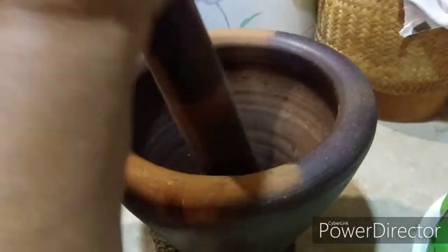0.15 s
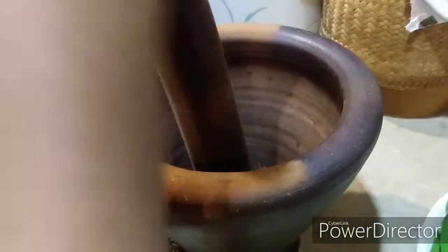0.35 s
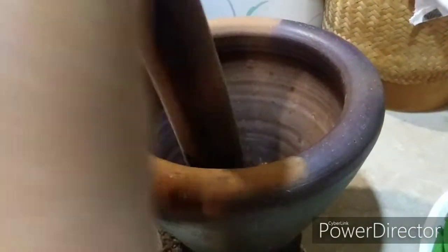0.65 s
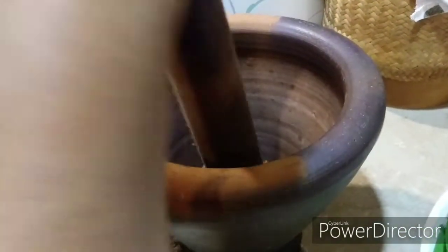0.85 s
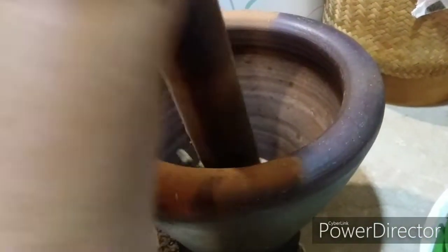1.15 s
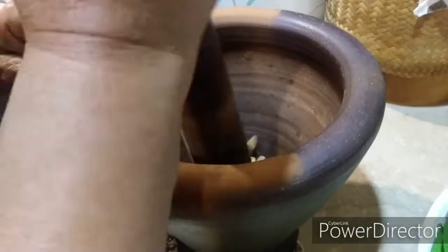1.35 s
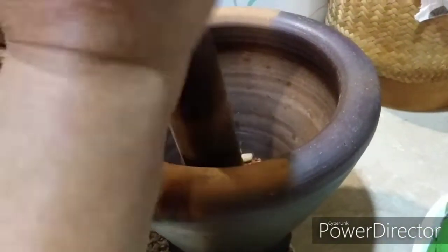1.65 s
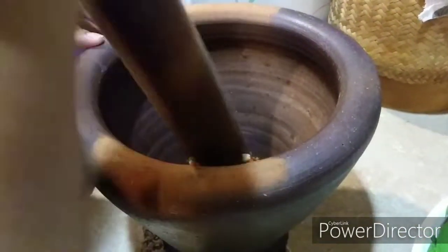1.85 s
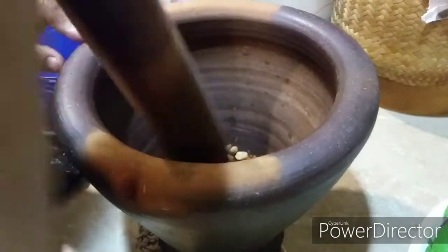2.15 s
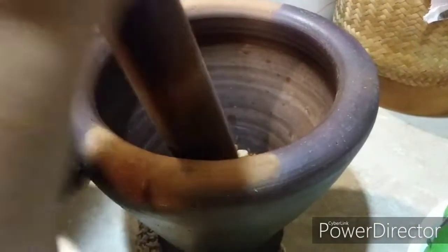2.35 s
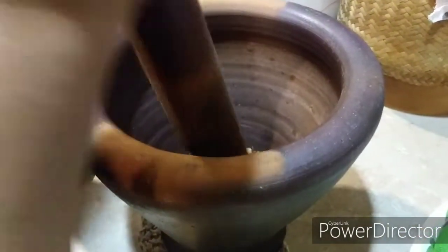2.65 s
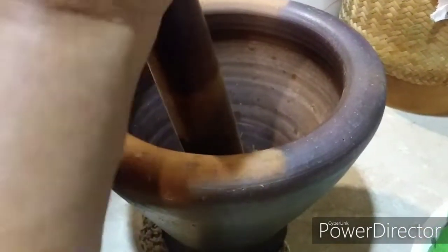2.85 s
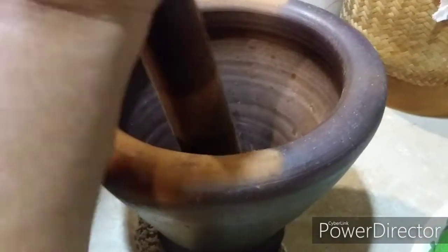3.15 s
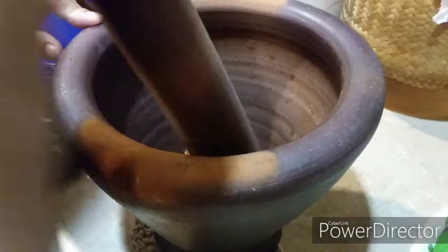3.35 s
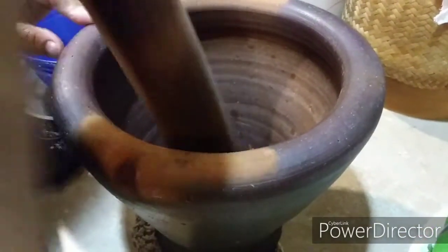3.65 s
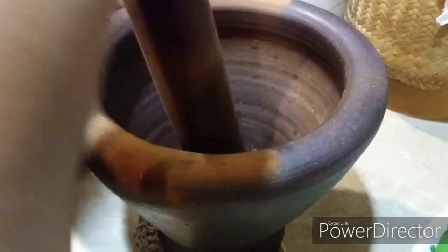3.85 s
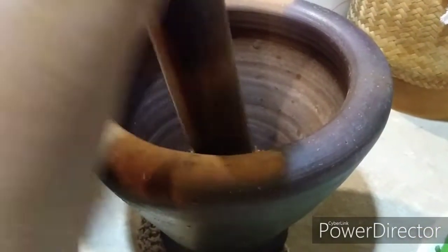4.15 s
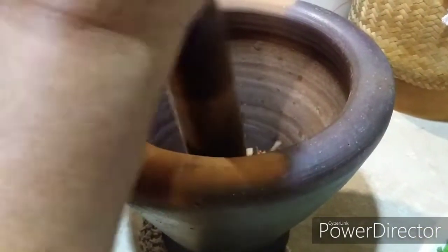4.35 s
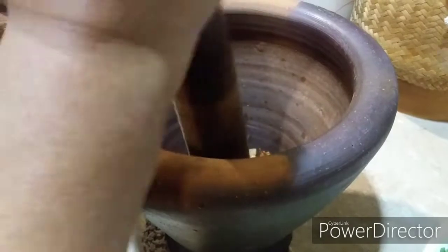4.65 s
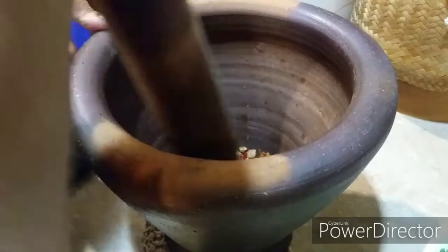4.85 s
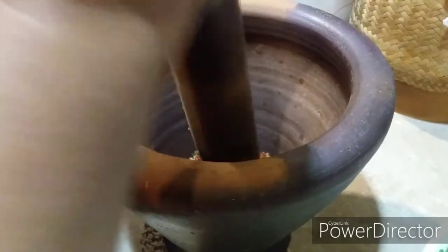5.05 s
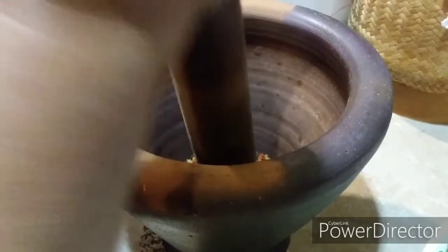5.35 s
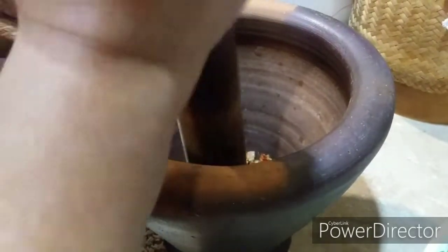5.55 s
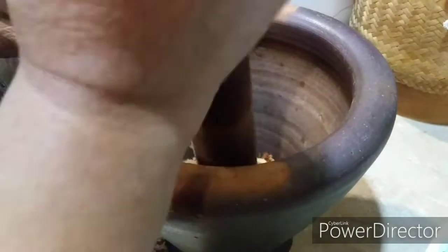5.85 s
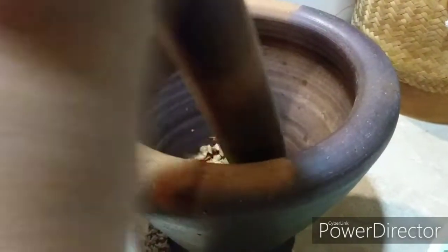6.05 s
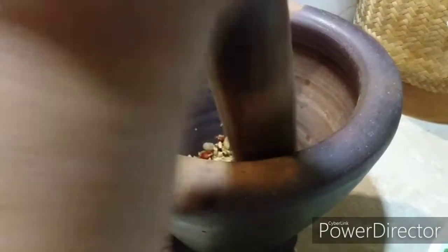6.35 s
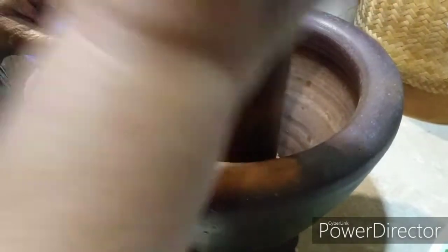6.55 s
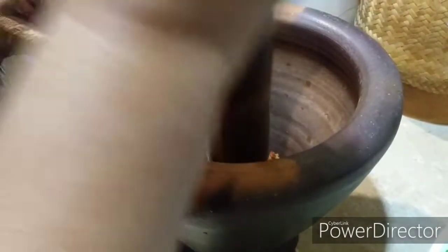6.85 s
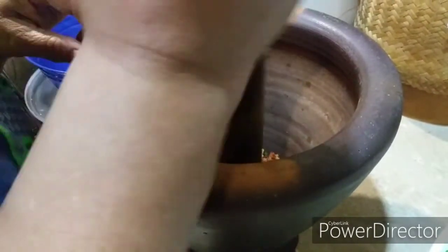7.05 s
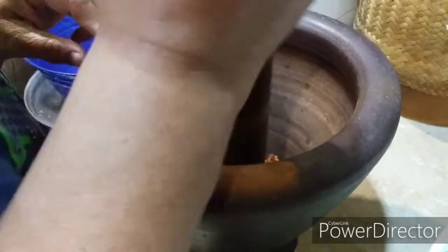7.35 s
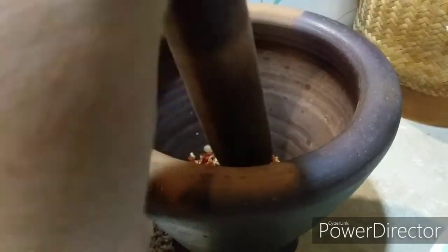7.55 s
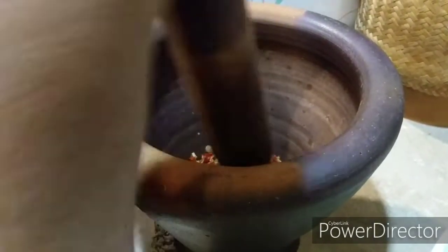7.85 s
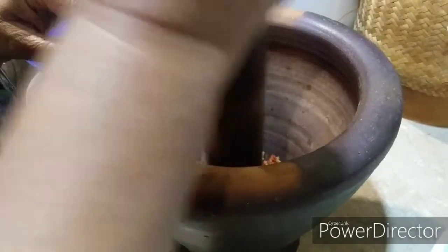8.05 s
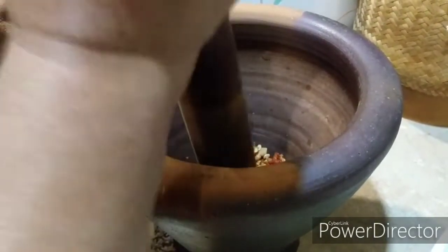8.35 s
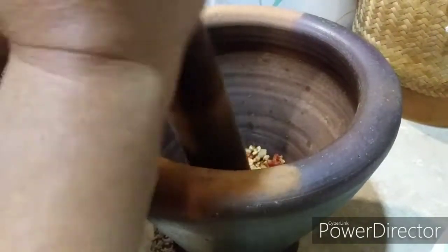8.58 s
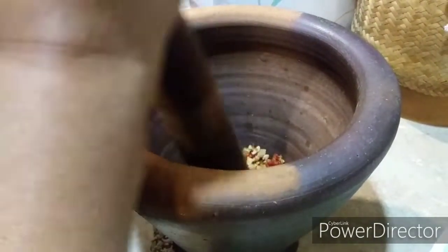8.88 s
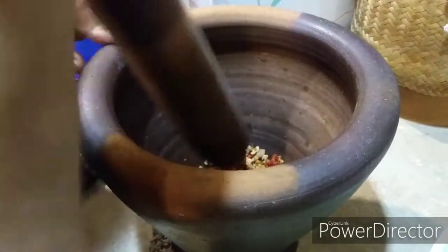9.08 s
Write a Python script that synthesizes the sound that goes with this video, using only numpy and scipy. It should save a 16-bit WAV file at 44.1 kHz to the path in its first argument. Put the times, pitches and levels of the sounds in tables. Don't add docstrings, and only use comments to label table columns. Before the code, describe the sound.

Very close in a small kitchen, a wooden pestle pounds chilli and garlic in a clay mortar at a steady three blows or so a second. Each hit is a crisp wet crunch with a woody knock, short clay ring and low thump of the loose pot on the counter. Crumbs tick and a bangle tinks faintly between blows. Later knocks turn harder and more ringing.

```python
import sys
import numpy as np
from scipy import signal
from scipy.fft import rfft, irfft, next_fast_len
from scipy.io import wavfile
from scipy.ndimage import map_coordinates

SR = 44100
rng = np.random.default_rng(int(sys.argv[2]) if len(sys.argv) > 2 else 0)


def log_audio(samples):
    frames = np.atleast_2d(samples).T
    limited = np.clip(frames, -1, 1)
    pcm = np.round(limited * 32767).astype(np.int16)
    wavfile.write(sys.argv[1], SR, pcm)


def ratio(d):
    e = np.asarray(d, float) / 20
    return 10 ** e


N = 406602

# start in seconds, length in seconds, level in dB,
# rise from start to end in dB.
CRUSHES = [(0.452, 0.017, -21, 17.5), (0.7588, 0.021, -23.5, 17.5), (1.055, 0.036, -18.5, 12),
           (1.3743, 0.02, -16.5, 3), (1.6677, 0.025, -18.5, 8), (1.97, 0.023, -15, 0),
           (2.2756, 0.016, -14, -1), (2.5761, 0.019, -17.5, 1.5), (2.858, 0.022, -18, 13),
           (3.16, 0.013, -18.5, 18), (3.4492, 0.033, -18, 9.5), (3.771, 0.024, -18, -6.5),
           (4.084, 0.012, -19, 12.5), (4.3895, 0.022, -15.5, 2.5), (4.6841, 0.024, -20.5, 13.5),
           (4.9832, 0.019, -13, -5), (5.2824, 0.015, -15.5, -3), (5.5798, 0.017, -17, -2.5),
           (5.879, 0.015, -16.5, 2), (6.165, 0.031, -23.5, 7), (6.486, 0.014, -18, 3.5),
           (6.789, 0.021, -20.5, 14.5), (7.1, 0.028, -20, -0.5), (7.3915, 0.025, -16, -4),
           (7.7044, 0.017, -18, 11), (8.0157, 0.022, -20, -22.5), (8.3002, 0.034, -16.5, -2),
           (8.625, 0.013, -18, 7.5), (8.928, 0.017, -18.5, -0.5)]
# start in seconds, peak in dB.
SNAPS = [(0.463, -17), (0.767, -2), (0.773, -3.5), (1.3882, 12.5), (1.6801, 2.5), (1.979, -14),
         (1.9876, -14.5), (2.579, 1.5), (2.584, -1.5), (2.5908, 3), (2.8687, -6), (2.875, 7.5),
         (3.4677, -3), (4.0915, -8), (4.4046, -8), (4.69, 4.5), (4.711, -7), (4.9875, -4), (5.0035, -1),
         (5.2996, 0.5), (5.5822, -1.5), (6.1712, -2.5), (6.1906, -2), (6.8023, -8.5), (7.107, 4.5),
         (7.3929, 2.5), (6.7776, -5), (7.7112, -2), (1.3765, -7), (8.931, -3.5)]
# frequency in Hz, level in dB.
PULP_TONE = [(200, -41.5), (800, -15), (1300, -4), (1800, -5), (2400, 2.5), (3400, -3.5), (4300, 2),
             (6000, -11.5)]
# start in seconds, knock in dB, weight in dB, hardness in dB.
BLOWS = [(0.4636, -21, -32, 18), (0.7667, -26.5, -38, 21), (1.0545, -40, -39.5, -2),
         (1.3731, -30, -29.5, -20.5), (1.6742, -28.5, -35, 19.5), (1.976, -28, -38, 16),
         (2.2808, -29, -35.5, 14), (2.577, -27, -40, 14), (2.8617, -32.5, -37, 0.5),
         (3.1662, -26, -37.5, 7), (3.4531, -25, -37, 7.5), (3.7802, -24, -38, 6.5),
         (4.0883, -21.5, -35.5, 17), (4.3947, -21.5, -35.5, 15.5), (4.6881, -22, -32.5, 11),
         (4.9817, -27.5, -35.5, 14), (5.2822, -36, -39, -6.5), (5.5794, -19, -28, -1),
         (5.8558, -14.5, -35, -6.5), (6.1742, -9, -33, -2), (6.4787, -10.5, -28.5, -3),
         (6.779, -9, -35, 2.8), (7.1069, -22.5, -27.5, 9), (7.3938, -18.5, -42, 6.5),
         (7.708, -24, -31, 15.5), (8.0165, -41, -34, 22), (8.3038, -26, -34, -12), (8.6081, -4.5, -32, 5.5),
         (8.9291, -19.5, -26, -3)]
# start in seconds, knock in dB, weight in dB, hardness in dB.
SOFT_TAPS = [
    (0.182, -36.5, -42, 7),
    (.195, -44, -63, -21),
    (.447, -36, -63, 24),
    (2.343, -36, -75.5, 8.5),
    (5.853, -31.5, -74, 9.5),
    (6.771, -36, -73, 0),
    (8.297, -40, -67, 12),
]
# frequency in Hz, width in Hz, level in dB.
PESTLE_BODY = [(1020, 200, -3), (1380, 160, 0), (1680, 250, -5)]
# frequency in Hz, width in Hz, level in dB.
POT_WALL = [(2050, 190, -1), (2420, 300, 0), (3200, 400, -5), (4250, 500, -13)]
# frequency in Hz, level in dB, 60 dB decay in seconds.
CLAY_MODES = [(484, -6, .1), (592, -5, .12), (915, -13, .08), (1031, -5, .24), (1180, -12, .07),
              (1357, -4, .19), (1432, -8, .13), (1500, -8, .11), (1680, -8, .09), (1965, -9, .11),
              (2045, -4, .17), (2121, -8, .12), (2290, -5, .14), (2382, -3, .17), (2500, -6, .13),
              (3200, -7, .15), (2750, -11, .08)]
# frequency in Hz, width in Hz, level in dB.
POT_THUD = [(188, 44, -8), (258.4, 33.8, 2), (317.7, 41.7, 0)]
# frequency in Hz, width in Hz, level in dB.
PESTLE_SIDE = [(467, 59, 2), (592, 48, -1.5), (724, 250, -9.5)]
# frequency in Hz, width in Hz, level in dB.
COUNTER_BOOM = [(69, 24, -8), (96.5, 32, -5.5), (139.7, 15, 4)]
# time in seconds, boom change in dB.
SEATING = [(0, -7), (1.1, -5.5), (1.8, -0.5), (4.5, 2), (6.4, -1), (7.3, 4.5), (8, -1), (9.2, -1)]
# start in seconds, peak in dB.
CRUMBS = [(0.034, -24), (0.075, -25), (0.0944, -23), (0.162, -22), (0.322, -19.5), (0.4468, -10),
          (0.6474, -24), (0.7014, -15.5), (0.951, -23), (1.2, -5), (1.2095, 3.5), (1.252, -8),
          (1.3355, -11.5), (1.4527, -6), (1.5484, -16), (1.6158, -7.5), (2.2094, -28), (2.5346, -17),
          (3.8781, -32), (4.2789, -23), (4.5438, -22), (5.8541, -15), (5.9641, -16), (5.9915, -13),
          (6.248, 2), (6.3803, -11), (6.581, -21.5), (8.373, -7), (8.4404, -21), (8.9138, -23)]
# start in seconds, peak in dB.
TINKS = [(1.1344, -36), (1.153, -27.5), (1.1674, -41), (1.1828, -27), (1.198, -31), (1.21, -23),
         (1.2274, -36), (1.242, -34), (1.261, -32.5), (1.273, -38), (1.322, -43), (1.495, -30.5),
         (1.5084, -34.5), (1.579, -43), (1.617, -47), (3.0288, -42), (4.6226, -46), (5.945, -26.5),
         (5.9616, -31), (5.991, -25.5), (6.2495, -20), (6.3787, -28.5), (6.6434, -35), (8.4603, -44.5)]
# frequency in Hz, level in dB, 60 dB decay in seconds.
BANGLE_MODES = [(2713, -5, .05), (3214, 0, .06), (4237, -4, .05), (4640, -10, .03), (7456, -16, .02)]
# start in seconds, peak in dB.
LUMP_TICKS = [
    (7.215, -49),
    (7.305, -50),
    (7.372, -55),
]
# time in seconds, level in dB.
RUSTLE = [(0, -41.5), (.3, -50), (.9, -66.5), (1.15, -35.5), (1.6, -52), (3.7, -48), (4.6, -80),
          (4.83, -36.5), (4.92, -55.5), (5.6, -72), (5.8, -42), (6, -60.5), (6.39, -47), (6.47, -61.5),
          (7.3, -51.5), (7.8, -49.5), (8.2, -66.5), (9.22, -52)]
# frequency in Hz, 60 dB decay in seconds.
ROOM_DECAY = [(100, 0.28), (500, 0.35), (2000, 0.31), (9000, 0.22), (15000, 0.2)]
# start in seconds, length in seconds, frequency in Hz, level in dB,
# overtone share from 0 to 1.
FAR_TONES = [
    (0, .17, 1720, -65, .7),
    (4.21, .18, 1680, -65, .5),
    (.29, .17, 335, -60, 0),
    (.58, .15, 335, -62, 0),
    (6.0, .16, 750, -64, 0),
    (0, .13, 2600, -67, 0),
    (2.17, .1, 2400, -65, 0),
    (2.19, .08, 2700, -67, 0),
    (3.58, .19, 2640, -67, 0),
    (4.2, .1, 680, -66, 0),
]
# frequency in Hz, level in dB.
HOUSE_AIR = [(20, -35), (60, -4.5), (135, -2.5), (195, -3), (310, 5), (800, -9), (2340, -11.5), (4300, -15),
             (9000, -31.5), (15000, -12.5)]
# frequency in Hz, gain in dB.
MIC_PORT = [(5700, 0), (7600, 8.5), (8400, 18.5), (9050, 21.5), (9800, 16), (11600, 1), (15200, -8)]

USUAL_CRUSH_DB, USUAL_KNOCK_DB, USUAL_WEIGHT_DB = -17, -27, -35
LEAD_DB = -25
ARCH_DB = 1.5
LAST_POP_DB = 3
DULL_DB, DULL_FOLLOWS = -9, .4
RING_DB, RING_GROWS = -55, 1.838
FLAT_RINGS = .4
ROCKING = .8
CHATTER_DB, CHATTER_T60 = 4, .25
BOOM_DB, BOOM_FOLLOWS, BOOM_WALL = -39, 0.61, 0.12
TAP_BOOM_LOSS_DB = 27.5
PUSH_DB = -8.5
SINK_S = 0.00952
CRUMB_T60 = .011
SETTLE_DB, SETTLE_WAIT_S, SETTLE_T60 = -27.5, .06, 0.26
EDGE_HZ, EDGE_LOSS_DB = 15550, 30


def unit(x):
    return x / np.sqrt(np.mean(x ** 2) + 1e-20)


def along(points, hz):
    f, v = np.transpose(points)
    return np.interp(np.log(hz + 1), np.log(f + 1), v)


def filtered(x, response):
    m = 2 * next_fast_len(len(x) // 2 + SR // 4)
    return irfft(rfft(x, m) * response(np.fft.rfftfreq(m, 1 / SR)), m)[:len(x)]


def causal(points):
    def response(hz):
        c = irfft(np.log(ratio(along(points, hz))))
        fold = np.r_[1, 2 * np.ones(len(c) // 2 - 1), np.zeros(len(c) // 2)]
        return np.exp(rfft(c * fold))
    return response


def resonant(peaks):
    def response(f):
        total = 0
        for k, (hz, width, db) in enumerate(peaks):
            damping = 1j * f * width
            total = total + (-1) ** k * ratio(db) * damping / (hz * hz - f * f + damping)
        return total
    return response


def burst(length, t60):
    fall = ratio(-60 * np.arange(length) / SR / t60)
    return unit(fall * rng.standard_normal(length)) * np.sqrt(np.mean(fall ** 2))


def ring(modes, t, tilt_db, rough):
    hz, db, t60 = np.transpose(modes)[:, :, None]
    scatter_db = 2 * rng.standard_normal((len(modes), 1))
    knots = rng.standard_normal((2, len(modes), 24))
    tents = np.maximum(0, 1 - np.abs(np.linspace(0, 23, len(t)) - np.arange(24)[:, None]))
    flutter = (knots[0] + 1j * knots[1]) @ tents
    dying = np.exp((2j * np.pi * hz - np.log(1000) / t60) * t)
    strength = ratio(db + scatter_db + tilt_db * np.log2(hz / 1600))
    return np.sum(strength * np.imag((1 + rough * flutter) * dying), axis=0)


def grains(rate, depth_db):
    knots = rng.standard_normal(int(N * rate / SR) + 4)
    lumps = map_coordinates(knots, [np.arange(N) * rate / SR], order=1)
    return unit(ratio(depth_db * np.clip(lumps, -3, 2)) * rng.standard_normal(N))


def add(track, s, sound):
    part = track[round(s * SR):][:len(sound)]
    part += sound[:len(part)]


def crush():
    bright, dull, t = np.zeros(N), np.zeros(N), np.arange(SR // 4) / SR
    pops = []
    for s, length, db, rise_db in CRUSHES:
        first_db, last_db = db - rise_db / 2, db + rise_db / 2
        pops.append((s + length - .002, last_db + LAST_POP_DB))
        when = np.array([-.008, -.001, .001, length / 2, length, length + 0.024, length + 0.15, length + 0.14])
        level_db = [first_db - 53.5, first_db + LEAD_DB, first_db, db + ARCH_DB,
                    last_db, last_db - 24.0, last_db - 48, last_db - 65]
        shape = ratio(np.interp(t - .008, when, level_db))
        add(bright, s - .008, shape)
        add(dull, s - .008, shape * ratio(DULL_DB - (1 - DULL_FOLLOWS) * (db - USUAL_CRUSH_DB)))
    bright = ratio(-1.5) * bright * grains(600, depth_db=3.5)
    dull = dull * grains(350, depth_db=5)
    for s, db in SNAPS + pops:
        snap = ratio(db - 2.5) * burst(300, 0.0029)
        add(bright, s, snap)
        add(dull, s, ratio(-9.0) * snap)
    fizz = filtered(bright, lambda hz: 1 / (1 + (5600 / (hz + 1)) ** 8))
    pulp = filtered(dull, causal(PULP_TONE + [(7500, -40.5)]))
    return ratio(-7) * fizz + ratio(7.5) * pulp


def blows():
    low, high, clay, thud, side, boom = np.zeros((6, N))
    t = np.arange(SR // 4) / SR
    push = np.hanning(14)
    for k, (s, knock_db, thud_db, hard_db) in enumerate(BLOWS + SOFT_TAPS):
        over_usual_db = knock_db - USUAL_KNOCK_DB
        ring_db = RING_DB + RING_GROWS * over_usual_db - FLAT_RINGS * hard_db
        boom_db = BOOM_DB + BOOM_FOLLOWS * (thud_db - USUAL_WEIGHT_DB) - BOOM_WALL * over_usual_db
        boom_db = boom_db + np.interp(s, *np.transpose(SEATING))
        if k >= len(BLOWS):
            boom_db = boom_db - TAP_BOOM_LOSS_DB

        contact = burst(len(t), .025)
        add(contact, 0, 3 * push)
        contact = contact + ratio(CHATTER_DB + ring_db - knock_db) * burst(len(t), CHATTER_T60)
        add(low, s, ratio(knock_db + 11.0 - hard_db / 2) * contact)
        add(high, s, ratio(knock_db + 7.0 + hard_db / 2) * contact)

        wall = ring(CLAY_MODES, t, tilt_db=.4 * hard_db, rough=ROCKING)
        add(clay, s, ratio(ring_db + 3) * wall * (1 - np.exp(-t / 0.003)))

        shove = 1.695 * burst(len(t), 0.16) * (1 - np.exp(-t / SINK_S))
        add(shove, 0, 2.13 * push)
        add(thud, s, ratio(thud_db + 26.0) * shove)
        add(side, s, ratio(thud_db + 23 - 0.22 * hard_db) * shove)
        add(boom, s, ratio(boom_db + 32) * burst(len(t), 0.22))
        add(boom, s + SINK_S, ratio(boom_db + 35.5 + PUSH_DB) * np.hanning(130))
    knock = filtered(low, resonant(PESTLE_BODY)) + filtered(high, resonant(POT_WALL))
    pot = filtered(thud, resonant(POT_THUD)) - filtered(side, resonant(PESTLE_SIDE))
    return knock + clay, pot + filtered(boom, resonant(COUNTER_BOOM))


def small_things():
    out, lump, t = np.zeros(N), np.zeros(N), np.arange(SR // 16) / SR
    for s, db in CRUMBS:
        add(out, s, ratio(db - 28) * np.diff(burst(900, CRUMB_T60)))
    for s, db in TINKS:
        tink = ring(BANGLE_MODES, t, tilt_db=0, rough=.6) * (1 - np.exp(-t / .0006))
        add(out, s, ratio(db - 10) * tink)
    for s, db in LUMP_TICKS:
        add(lump, s, ratio(db + 14) * burst(len(t), .04))
    return out + filtered(lump, resonant([(780, 130, 14), (1750, 380, 2)]))


def rustle():
    s, db = np.transpose(RUSTLE)
    busy, t = ratio(np.interp(np.arange(N) / SR, s, db)), np.arange(SR // 3) / SR
    settling = ratio(SETTLE_DB - 60 * np.abs(t - SETTLE_WAIT_S) / SETTLE_T60)
    for row in BLOWS:
        add(busy, row[0], settling)
    tone = [(1000, -3.5), (4000, -3), (9000, -14)]  # (Hz, dB)
    fine = filtered(grains(500, depth_db=4), lambda hz: ratio(along(tone, hz)))
    return ratio(-17.0) * busy * unit(fine)


def kitchen(x):
    out = np.zeros(N)
    cuts = [0] + [round((row[0] - .05) * SR) for row in BLOWS] + [N]
    for a, b in zip(cuts, cuts[1:]):
        hz, t, z = signal.stft(rng.standard_normal(SR // 3), SR, nperseg=256)
        decay = ratio(-60 * t / along(ROOM_DECAY, hz)[:, None])
        tail = signal.istft(z * decay, SR, nperseg=256)[1]
        add(out, a / SR + .005, signal.fftconvolve(x[a:b], tail / np.linalg.norm(tail)))
    return out


def far_tones():
    out = np.zeros(N)
    for s, length, hz, db, share in FAR_TONES:
        turn = 2 * np.pi * hz * np.arange(round(length * SR)) / SR
        swell = np.sqrt(np.hanning(len(turn)))
        tone = np.sin(turn) + share * np.sin(2 * turn) + share ** 4 * np.sin(3 * turn)
        add(out, s, ratio(db) * swell * tone)
    return out


def air():
    return ratio(-60.5) * unit(filtered(rng.standard_normal(N), lambda hz: ratio(along(HOUSE_AIR, hz))))


def scene():
    wet, (knock, body), small = crush(), blows(), small_things()
    echo = kitchen(ratio(-16.0) * wet + ratio(-9.5) * knock + ratio(-7.5) * body + ratio(-16.0) * small)
    return (wet + knock + body + small + echo + far_tones() + rustle() + air())[None]


def roll_off(x):
    return signal.sosfilt(signal.butter(12, 16640, fs=SR, output="sos"), x)


def record(dry):
    def band(hz):
        edge = ratio(-EDGE_LOSS_DB * (1 + np.tanh((hz - EDGE_HZ) / 120)) / 2)
        return (hz < 16600) * edge / (1 + (26 / (hz + 1)) ** 4)
    x = filtered(dry[0], causal(MIC_PORT))
    x = x / (1 + np.abs(x / .66) ** 5) ** (1 / 5)
    return roll_off(filtered(x, band)[None])


dry = scene()
out = record(dry)
log_audio(out)
```